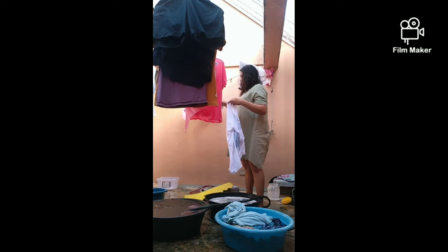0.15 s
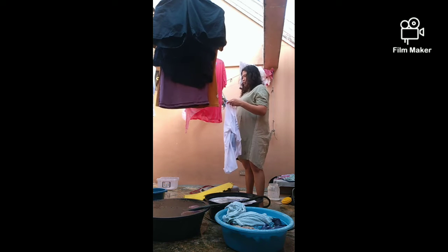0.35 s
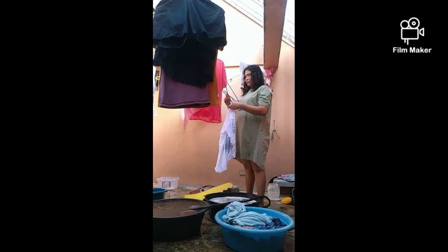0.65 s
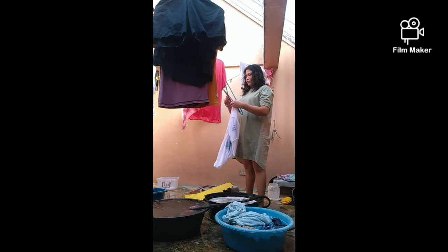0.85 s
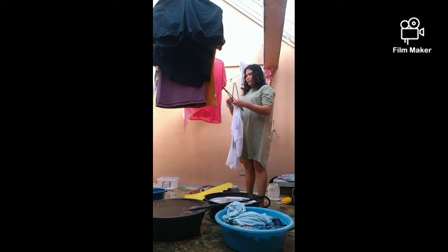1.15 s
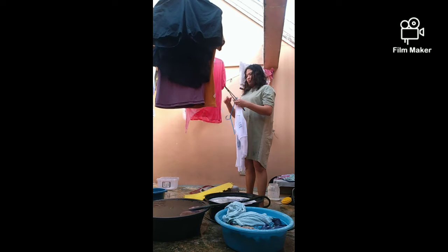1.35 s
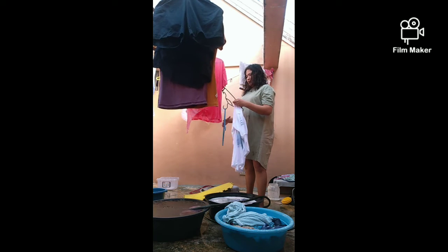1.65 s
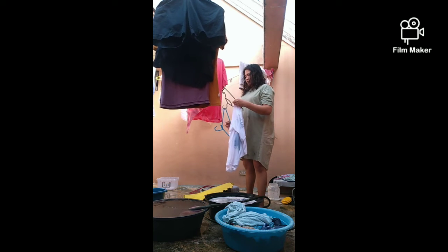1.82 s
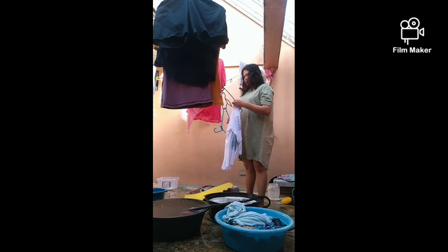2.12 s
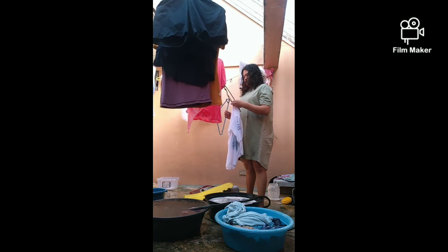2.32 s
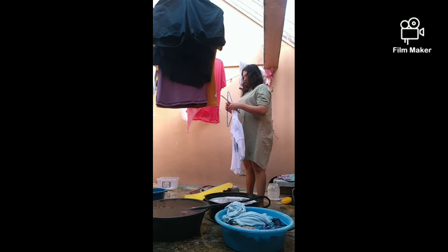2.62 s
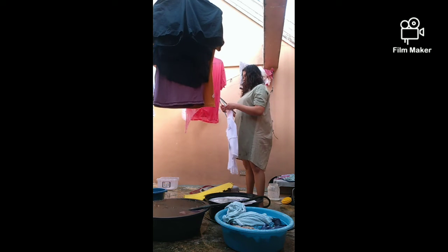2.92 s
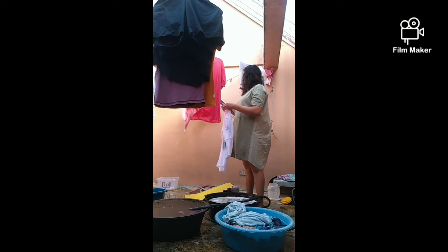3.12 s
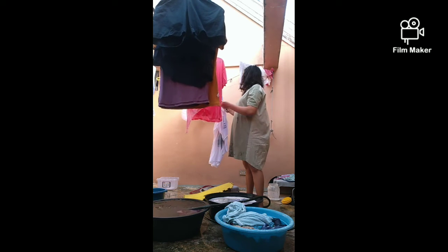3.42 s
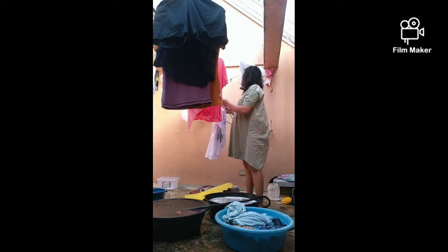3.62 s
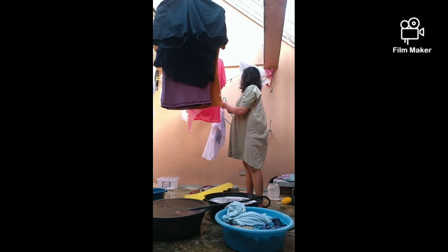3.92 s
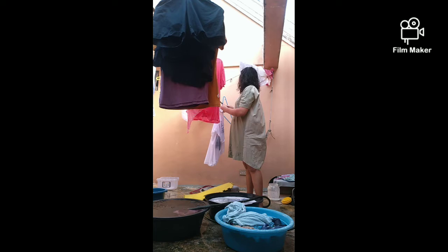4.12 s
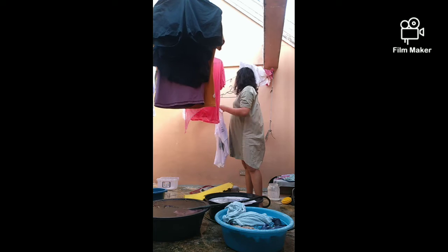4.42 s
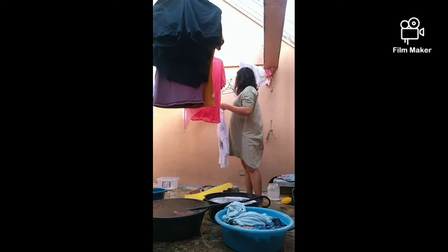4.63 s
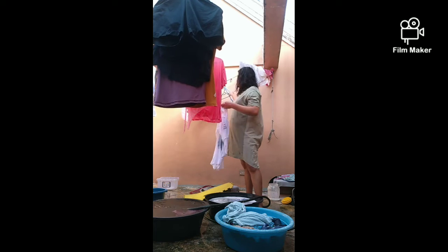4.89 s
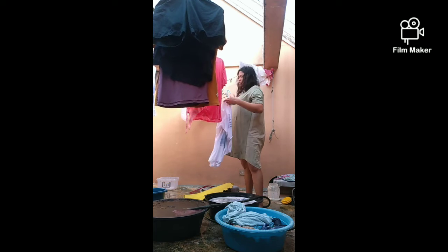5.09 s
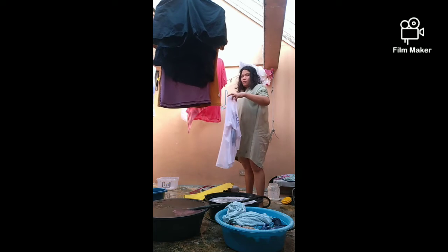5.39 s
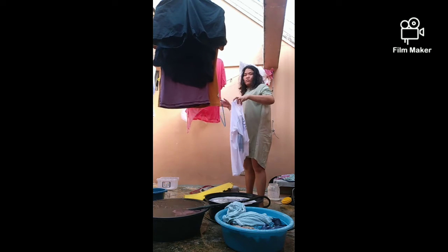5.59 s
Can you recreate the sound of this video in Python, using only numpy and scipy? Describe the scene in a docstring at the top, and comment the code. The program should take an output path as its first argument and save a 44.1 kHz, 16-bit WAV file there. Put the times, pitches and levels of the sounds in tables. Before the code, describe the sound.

Hangers clatter and click as wet laundry is hung in a small walled yard, with drips plinking into basins and faint far birds.

```python
"""Hangers clatter as wet laundry is hung up in a small walled yard; more hangers click and wet cloth drags.
Clatter and clicks are filtered noise bursts; the cloth is crackle through a sliding resonance, with squelches.
Drips into basins are ringing bubbles; basins knock as damped modes; air thumps on the right microphone port.
Far off a small bird chirps in noise glides, and what may be a dove and a rooster call in wavering tones.
A faint background lies beneath, and a thin filtered hiss comes and goes on the right."""
import sys
import numpy as np
from scipy import signal
from scipy.fft import rfft, irfft, next_fast_len
from scipy.io import wavfile
from scipy.ndimage import map_coordinates

SR = 44100
rng = np.random.default_rng(int(sys.argv[2]) if len(sys.argv) > 2 else 0)


def put_to_file(sound):
    """Save the sound as 16-bit audio at rate SR, in the file named by the first command-line argument."""
    columns = np.atleast_2d(sound).T  # one column per channel
    safe = np.clip(columns, -1, 1)
    whole_steps = np.round(safe * 32767)
    wavfile.write(sys.argv[1], SR, whole_steps.astype(np.int16))


N = 253575

# Filter of a hollow knock or a slap on water. Each row: frequency in Hz, relative gain in dB.
KNOCK_COLOUR = [(300, -13.5), (700, -15), (1200, -11), (2000, 6.5), (3000, 11), (4500, 5.5), (7000, -59.5)]
# Filter of rubbed wet cloth or of spray. Each row: frequency in Hz, relative gain in dB.
HISS_COLOUR = [(1760, -38.5), (3000, -31), (5000, -11), (6800, -6.5), (7920, -2), (9200, -7), (14100, -29)]


def amp(db):
    """Decibels express an amplitude ratio on a logarithmic scale."""
    return 10 ** (np.asarray(db) / 20)


def unit(x):
    """Normalization: x is scaled to a root-mean-square value of one."""
    return x / np.sqrt(np.mean(x ** 2) + 1e-20)


def along(points, hz):
    """Interpolation of (Hz, value) points on a logarithmic frequency axis."""
    f, v = np.transpose(points)
    return np.interp(np.log(hz + 1), np.log(f + 1), v)


def curves(rows):
    """Linear interpolation in time: one value per sample for each column after the time."""
    s, *columns = np.transpose(rows)
    return [np.interp(np.arange(N) / SR, s, column) for column in columns]


def wobble(rate, size):
    """Band-limited fluctuation: a smooth curve through random knots, rate of them a second."""
    knots = rng.standard_normal(int(size * rate / SR) + 4)
    return map_coordinates(knots, [np.arange(size) * rate / SR])


def coloured(x, spectrum):
    """Minimum-phase filtering: a folded cepstrum gives the (Hz, dB) shape without pre-echo."""
    size = x.shape[-1]
    m = 2 * next_fast_len(size // 2 + 2048)
    gain = amp(along(spectrum, np.fft.rfftfreq(m, 1 / SR)))
    cepstrum = irfft(np.log(gain + 1e-6))
    cepstrum[1:m // 2] *= 2
    cepstrum[m // 2 + 1:] = 0
    response = np.exp(rfft(cepstrum))
    return irfft(rfft(x, m) * response, m)[..., :size]


def panned(lean_db):
    """Constant-power panning: lean_db is the left level minus the right."""
    g = amp(np.array([lean_db, -lean_db]).reshape(2, -1) / 2)
    return g / np.sqrt(np.mean(g ** 2, axis=0))


def add(track, s, sound):
    """Superposition: a sound is mixed into the track at s seconds."""
    start = max(round(s * SR), 0)
    track[:, start:start + sound.shape[-1]] += sound[..., :max(N - start, 0)]


def yard(x, wet_db, stretch=1):
    """Reverberation: a noise tail, decaying by frequency, stands for the walls and differs at each port."""
    # Decay of the walls. Each row: frequency in Hz, time in seconds to fall 60 dB when stretch is 1.
    decay = [(300, 0.67), (1300, 0.42), (3500, 0.38), (8000, 0.27), (13000, 0.42)]
    hz, t, z = signal.stft(rng.standard_normal((2, SR // 2)), SR, nperseg=256)
    t60 = stretch * along(decay, hz)[:, None]
    tail = signal.istft(z * amp(-60 * t / t60), SR, nperseg=256)[1]
    response = amp(wet_db) * tail / np.linalg.norm(tail[0])
    response[:, 0] += 1  # direct sound
    return signal.fftconvolve(np.atleast_2d(x), response / np.hypot(1, amp(wet_db)), axes=1)


def patchy(x, depth_db, width_hz, span):
    """Short-lived resonances: random patches of gain, width_hz wide and span seconds long."""
    hz, t, z = signal.stft(x, SR, nperseg=256)
    grid = np.meshgrid(hz / width_hz, t / span, indexing="ij")
    knots = rng.standard_normal((int(hz[-1] / width_hz) + 3, int(t[-1] / span) + 3))
    gain = amp(depth_db * map_coordinates(knots, grid))
    return signal.istft(z * gain, SR, nperseg=256)[1][..., :x.shape[-1]]


def crackle(rate, spread_db, smooth):
    """Shot noise: random snaps, rate a second, reverberate over a share of smooth noise."""
    signs = (rng.random(N) < rate / SR) * rng.choice([-1, 1], N)
    snaps = signs * amp(spread_db * np.minimum(rng.exponential(size=N), 4))
    return unit(yard(snaps, wet_db=13, stretch=0.55)[:, :N]) + smooth * rng.standard_normal((2, N))


def noisy_glide(length, hz_from, hz_to, width):
    """Narrow-band noise: two random envelopes modulate a gliding carrier; width is a share of hz_from."""
    u = np.linspace(0, 1, int(length * SR))
    phase = 2 * np.pi * np.cumsum(hz_from * (hz_to / hz_from) ** u) / SR
    band = wobble(width * hz_from, len(u)) * np.sin(phase) + wobble(width * hz_from, len(u)) * np.cos(phase)
    sputter = amp(3.5 * wobble(130, len(u)))
    return unit(band * sputter * signal.windows.tukey(len(u), .3))


def clatter():
    """Modal ringing after impact noise: hangers rattle together, ring briefly and settle."""
    # Filters of the treble and the body. Each row: frequency in Hz, relative gain in dB.
    top_colour, body_colour = [(2060, -38.5), (3500, -35), (4090, -29), (5660, -21), (6320, -25),
                               (7790, -14.5), (9770, -23), (10400, -31.5), (12000, -28), (12900, -41.5),
                               (14000, -37)], [(210, -18.5), (350, -42), (600, -12.5), (921, -20.5),
                                                    (1050, -15), (1310, -17), (1430, -10.5), (2710, -10.5),
                                                    (2930, -13), (3800, -24), (4940, -49.5), (8360, -120)]
    # Modes of the hangers. Each row: frequency in Hz, relative level in dB, time to fall 60 dB in seconds.
    modes = [(1055, -3, 0.16), (1290, -9.5, 0.34), (1387, -2, 0.35), (1510, -12.5, 0.099), (1970, -5, 0.43),
             (3020, 1, 0.1), (6550, 3, .22), (7300, 4.5, 0.27), (7560, -2.5, .25), (8360, -4, 0.32),
             (8060, -2, .3), (9100, 0.5, 0.16), (9600, -2, 0.33)]
    top_db, top_db_per_s = -24, 192
    body_db, body_db_per_s = -31, 164  # the body settles more slowly
    ring_db = -23  # peak, before panning
    t = np.arange(N) / SR
    top = unit(patchy(coloured(crackle(1500, 3.4, 0.86), top_colour), 5.9, 250, 0.098))
    top = top * amp(top_db - top_db_per_s * t)
    body = unit(patchy(coloured(crackle(900, 3.2, .3), body_colour), 4.5, 250, .022))
    body = body * amp(body_db - body_db_per_s * t)
    ring, t = 0, t[:SR]
    for hz, db, t60 in modes:
        phase = 2 * np.pi * (hz * t + rng.random((2, 1))) + 0.36 * wobble(87, SR)
        ring = ring + amp(db - 60 * t / t60) * np.sin(phase)
    out = top * panned(-6.0) + body * panned(-3.1)
    add(out, 0, amp(ring_db) * ring / np.abs(ring).max() * panned(-14))
    return out


def air(shared=4.6):
    """Partly coherent noise: both ports share most of the yard's faint, uneven background."""
    # Filter of the background. Each row: frequency in Hz, relative gain in dB.
    air_colour = [(25, -35), (55, 5), (90, 3.5), (230, -1.5), (380, -14), (1100, -25.5), (2500, -28.5),
                  (6500, -31.5), (7900, -22.5), (9400, -30), (14000, -44)]
    # The background sinks at the end. Each row: time in seconds, change of level in dB.
    fade = [(5.35, 0), (5.6, -3)]
    noise = rng.standard_normal((2, N)) + shared * rng.standard_normal(N)
    noise = patchy(noise, 3.5, 700, .15)
    level_db = -73 + curves(fade)[0] + 0.39 * wobble(8.7, N)
    return amp(level_db) * unit(coloured(noise, air_colour))


def far_hiss(lean_db=-17):
    """Filtered noise with a slow envelope: a thin, uneven far hiss reaches mainly the right port."""
    # Envelope. Each row: time in seconds, mean level in dB.
    envelope = [(0, -72.5), (0.6, -73), (1.9, -82), (3.75, -87), (4.75, -82.5), (5.75, -86)]
    # Filter of the hiss. Each row: frequency in Hz, relative gain in dB.
    far_colour = [(3000, -37), (6300, -17.5), (7800, -0.5), (8600, -7.5), (10000, -30), (14000, -44)]
    level_db, = curves(envelope)
    noise = patchy(coloured(rng.standard_normal((2, N)), far_colour), 3.5, 600, .06)
    return amp(level_db + 1.0 * wobble(35, N)) * unit(noise) * panned(lean_db)


def drips(attack=0.0037, splat_db=-18):
    """Bubble resonance: a drop slaps the water, throws spray and traps a ringing bubble and smaller ones."""
    # Each row: start in seconds, peak level before panning in dB, bubble pitch in Hz,
    # left minus right in dB, spray level relative to the bubble in dB.
    drops = [(0.026, -31.5, 1036, -8, -14), (0.073, -35, 1446, -6, -28), (0.098, -41, 2310, -6.5, -23.5),
             (0.212, -49.5, 2126, -15, -16), (0.231, -53, 2226, -8.5, -18), (0.3054, -56, 2850, -20, -27),
             (0.829, -38, 2090, -15, -25), (1.051, -43, 2737, -14, -13.5), (1.143, -42.5, 1950, -8, -19.5),
             (1.6713, -48, 2860, -25, -7), (1.7722, -42.5, 1458, -9.5, -32.5),
             (1.996, -47, 2020, -12.5, -16), (2.08, -44, 2596, -13, -27.5), (2.152, -51, 3050, -9.5, -21),
             (2.174, -44, 2475, -12.5, -23.5), (2.4537, -59, 3100, -32, -24),
             (2.468, -50.5, 1570, -36.5, -20), (2.506, -61, 2650, -22, -21), (2.575, -62, 3600, -21, -24),
             (2.612, -58, 3160, -5, -24), (2.6333, -48, 2560, -26, -19), (3.1063, -42.5, 1995, -7, -28),
             (3.269, -53.5, 2740, -12.5, -17), (3.438, -54, 2130, -8.5, -21), (3.4964, -57, 2160, -10, -26),
             (3.5126, -40.5, 2387, -14, -27), (3.536, -47.5, 2440, -10, -24), (3.6226, -52, 2920, -24, -32),
             (3.6504, -49.5, 2903, -33, -36), (3.8418, -58.5, 2270, -22.5, -28),
             (4.0469, -44.5, 1602, -24, -22.5), (4.071, -51.5, 1650, -5, -36),
             (4.2453, -47.5, 2360, -22.5, -23), (4.8376, -57, 2360, -20, -27),
             (5.0694, -56, 2276, -11, -22), (5.488, -61, 2330, -20.5, -22)]
    satellite_db, satellite_spread, satellite_s = -15, .2, .025  # level, pitch scatter (share), latest start
    echo_db, echo_s = -11, .021  # the nearest wall returns each drip
    out, t = np.zeros((2, N)), np.arange(SR // 12) / SR

    def bubble(hz, delay, t60):
        """Damped oscillation: an unsteady pitch dies by 60 dB in t60 seconds."""
        age = np.maximum(t - delay, 0)
        pitch = hz * np.exp(.036 * wobble(900, len(t)))
        onset = 1 - np.exp(-(age / attack) ** 2)
        return np.sin(2 * np.pi * np.cumsum(pitch) / SR) * amp(-60 * age / t60) * onset

    for s, db, hz, lean_db, spray_db in drops:
        bubbles = bubble(hz, 0, .038) * amp(2.3 * wobble(400, len(t)))
        for _ in range(3):
            small_hz = hz * np.exp(rng.normal(0, satellite_spread))
            bubbles += amp(satellite_db) * bubble(small_hz, satellite_s * rng.random() ** 2, .025)
        slap = amp(splat_db) * coloured(rng.standard_normal(len(t)) * amp(-60 * t / 0.023), KNOCK_COLOUR)
        spray = unit(coloured(rng.standard_normal(len(t)), HISS_COLOUR)) * amp(spray_db - 60 * t / 0.1)
        echo = amp(echo_db) * bubble(hz, echo_s, .035)
        splash = (slap + spray) * (1 - np.exp(-t / attack))
        plink = yard(bubbles + echo + splash, wet_db=-5, stretch=0.7)
        add(out, s, amp(db) * plink / np.abs(plink).max() * panned(lean_db))
    return out


def squeaky(x, centre_hz):
    """Time-varying resonance: x passes a spectral peak whose pitch slides."""
    peak_db, width_octaves = 8, .16
    hz, t, z = signal.stft(x, SR, nperseg=256)
    centre = np.interp(t * SR, np.arange(len(centre_hz)), centre_hz)
    octaves = np.log2((hz[:, None] + 1) / centre)
    gain = amp(peak_db * np.exp(-.5 * (octaves / width_octaves) ** 2))
    return unit(signal.istft(z * gain, SR, nperseg=256)[1][:, :x.shape[-1]])


def cloth():
    """Stick-slip friction: wet cloth jerks over the hanger; hiss and rasp swell, hold and die as a squeak slides."""
    # Each row: start in seconds, swell in seconds, hold in seconds, hiss level in dB, rasp level in dB,
    # squeak in Hz at the start, squeak in Hz at the end of the hold.
    strokes = [(0.171, 0.015, 0.023, -54.5, -58.5, 7060, 6530), (0.847, 0.011, 0.16, -65, -81, 7700, 7300),
               (1.63, 0.015, 0.11, -49, -67.5, 5760, 8240), (2.389, 0.0027, 0.011, -52, -77, 8600, 9100),
               (2.445, 0.021, 0.055, -61, -79, 8500, 7640), (2.553, 0.022, 0.042, -45, -66, 6330, 8200),
               (2.656, 0.022, 0.016, -51.5, -50.5, 6000, 6900),
               (3.327, 0.038, 0.043, -48.5, -95, 9200, 6500), (3.404, 0.011, 0.078, -42, -73.5, 8350, 6550),
               (3.48, 0.0096, 0.14, -68.5, -65, 6000, 7700), (4.136, 0.052, 0.082, -43.5, -62, 5560, 8500),
               (4.286, 0.0037, 0.02, -45, -53.5, 7360, 7000), (4.358, 0.0032, 0.0083, -45, -60, 7900, 7550),
               (4.403, 0.0032, 0.0092, -46.5, -60, 8040, 5900), (4.502, 0.022, 0.012, -57, -77, 7800, 8420),
               (4.882, .003, .008, -67, -78, 8100, 7900), (4.919, 0.042, 0.052, -51, -59.5, 7040, 8200),
               (5.024, 0.0053, 0.038, -48.5, -64, 8240, 7660), (5.077, 0.025, 0.12, -52, -62, 7700, 6950),
               (5.195, 0.05, 0.066, -45, -57, 7000, 5700), (5.325, 0.042, 0.015, -42.5, -67, 7400, 7460),
               (5.41, 0.0079, 0.013, -61, -82, 7450, 7300), (5.508, 0.02, 0.011, -59.5, -84, 9800, 6200)]
    # Filter of the rasp. Each row: frequency in Hz, relative gain in dB.
    rasp_colour = [(500, -15.5), (1100, -32), (1800, -19), (2600, -3), (3800, -2.5), (6000, -17.5)]
    slips_per_s, slip_s, slip_size = 45, .006, .55  # small jerks: rate, life, size against the steady pull
    swell_db, release_db_per_s, grab_s = 15.5, 267, 0.01  # growth, dying away, time to take hold
    rasp_growth = 2.5  # the rasp follows the pull more steeply than the hiss
    jerks = (rng.random(N) < slips_per_s / SR) * rng.uniform(.3, 1, N)
    grip = 1 + slip_size * signal.lfilter([1], [1, -np.exp(-1 / (slip_s * SR))], jerks)
    hiss = unit(grip * patchy(coloured(crackle(900, 3.8, .3), HISS_COLOUR), 2.5, 550, .02))
    rasp = unit(grip * patchy(coloured(crackle(500, 3.3, .3), rasp_colour), 4, 300, .025))
    out = np.zeros((2, N))
    for s, swell_s, hold_s, hiss_db, rasp_db, hz_from, hz_to in strokes:
        span = np.arange(round(s * SR), min(round(s * SR) + SR // 2, N))
        t = (span - span[0]) / SR
        squeak_hz = hz_from * (hz_to / hz_from) ** np.clip(t / (swell_s + hold_s), 0, 1)
        pull_db = -swell_db * np.clip(1 - t / swell_s, 0, 1)
        release = amp(-release_db_per_s * np.maximum(t - swell_s - hold_s, 0))
        contact = np.clip(t / grab_s, 0, 1) * release
        add(out, s, contact * amp(hiss_db + pull_db) * squeaky(hiss[:, span], squeak_hz) * panned(-6.5))
        add(out, s, contact * amp(rasp_db + rasp_growth * pull_db) * rasp[:, span] * panned(-6.5))
    return out


def note(length, hz_from, hz_to, waver, partials, flutter_db):
    """Harmonic synthesis: a wavering bird note with soft ends, each partial fluttering in level."""
    u = np.linspace(0, 1, int(length * SR))
    pitch = hz_from * (hz_to / hz_from) ** u * (1 + waver * wobble(170, len(u)))
    phase = 2 * np.pi * np.cumsum(pitch) / SR
    tone = sum(amp(db + flutter_db * wobble(50, len(u))) * np.sin(round(k) * phase) for k, db in partials)
    return unit(tone * signal.windows.tukey(len(u), .5))


def birds():
    """Reverberant blurring: distant chirps, wavering tones and crowing mix with their reflections."""
    # Falling chirps of a small bird. Each row: start in seconds, length in seconds, level in dB.
    chirp_rows = [(0.524, 0.094, -64), (2.47, 0.1, -69.5), (3.546, 0.087, -65), (4.586, 0.073, -67.5),
                  (4.719, 0.073, -78.5), (5.647, 0.068, -68.5)]
    # Coos, and from 4.3 s on fainter wavering tones near 520-560 Hz that are probably part of the far crow.
    # Each row: start in seconds, length in seconds, central pitch in Hz, level in dB,
    # waver as a share of the pitch.
    tone_rows = [(0.305, 0.049, 573, -74, 0.044), (2.445, 0.015, 386, -67, 0.042),
                 (3.33, 0.12, 488.6, -57, 0.02), (3.45, 0.059, 479.5, -70.5, 0.048),
                 (4.361, 0.13, 519.5, -66, 0.064), (4.655, 0.092, 557, -74.5, 0.068),
                 (4.773, 0.11, 541, -68, 0.12)]
    # Syllables of a far crow. Each row: start in seconds, length in seconds, level in dB.
    crow_rows = [(4.388, 0.13, -64.5), (4.725, 0.1, -65), (4.92, 0.21, -74.5)]
    # Partials of the crow. Each row: harmonic number, relative level in dB.
    throat = [(2, 2.5), (3, -7.5), (4, -6.5)]
    chirp_hz, octaves_per_s = 5020, 6.2  # every chirp starts here and falls at this rate
    crow_hz = 454.4  # fundamental, itself silent
    out = np.zeros((2, N))
    for s, length, db in chirp_rows:
        end_hz = chirp_hz / 2 ** (octaves_per_s * length)
        chirp = yard(noisy_glide(length, chirp_hz, end_hz, .16), wet_db=5, stretch=1.1)
        add(out, s, amp(db) * patchy(chirp, 3.5, 350, .025) * panned(-9.0))
    for s, length, hz, db, waver in tone_rows:
        tone = yard(note(length, hz, hz, waver, [(1, 0)], 2.5), wet_db=-5, stretch=0.55)
        add(out, s, amp(db) * tone)
    for s, length, db in crow_rows:
        syllable = yard(note(length, crow_hz, crow_hz, .036, throat, 4), wet_db=6, stretch=1.2)
        add(out, s, amp(db) * syllable)
    return out


def puffs(ragged=0.46):
    """Pressure swings and turbulence: each puff drives the right port unevenly and leaves a wake of eddies."""
    # Each row: centre in seconds, level in dB, standard deviation of the bell-shaped envelope in seconds.
    puff_rows = [(0.51, -25, 0.004), (0.525, -36.5, 0.0049), (0.614, -34, 0.01), (0.651, -35, 0.01),
                 (0.782, -38.5, 0.0056), (0.887, -39, 0.018), (0.944, -33.5, 0.0061), (1.034, -50, 0.03),
                 (1.616, -46.5, 0.006), (1.889, -45, 0.012), (2.343, -44, 0.02), (2.456, -46.5, 0.0091),
                 (3.461, -48, 0.028), (3.596, -31.5, 0.028), (3.643, -27, 0.013), (3.79, -38, 0.0087),
                 (3.877, -23.5, 0.0035), (3.903, -31, 0.018), (3.988, -33, 0.0038), (4.793, -45, 0.012),
                 (4.836, -50, 0.065)]
    # Filter of the eddies. Each row: frequency in Hz, relative gain in dB.
    eddy_colour = [(25, -29.5), (55, 12), (150, 5), (240, -7.5), (330, -30), (900, -43.5), (3000, -100)]
    port_hz = 90.98  # central rate of the swing
    wake_db, wake_db_per_s = -15.5, 92
    out, t = np.zeros((2, N)), np.arange(-SR // 8, SR // 3) / SR
    wake = np.clip(t * port_hz, 0, 1) * amp(wake_db - wake_db_per_s * np.abs(t))
    for s, db, length in puff_rows:
        swing = np.sin(2 * np.pi * np.cumsum(port_hz * np.exp(0.207 * wobble(121.0, len(t)))) / SR)
        eddies = unit(coloured(rng.standard_normal((2, len(t))), eddy_colour))
        gust = ragged * np.exp(-np.abs(t) / (1.38 * length))
        push = swing * np.exp(-.5 * (t / length) ** 2) + eddies * np.maximum(gust, wake)
        add(out, s + t[0], amp(db) * push * panned(-40))
    return signal.sosfilt(signal.butter(4, 50, "high", fs=SR, output="sos"), out)  # the port passes no deep bass


def gurgle(count=1500, typical_hz=2050, spread=0.403, life_cycles=8):
    """Granular bubble noise: tiny bubbles of scattered pitch and size each last a few cycles."""
    when, pitch, size = rng.random(count), rng.standard_normal(count), rng.random(count)
    t = np.arange(SR // 40) / SR
    cycles = typical_hz * np.exp(spread * 1.61 * np.tanh(pitch / 1.6))[:, None] * t
    age = cycles / life_cycles
    grains = size[:, None] ** 2 * age * np.exp(-2 * age) * np.sin(2 * np.pi * cycles)
    index = (when * N).astype(int)[:, None] + np.arange(len(t))
    stream = np.bincount(index.ravel(), grains.ravel(), N)[:N]
    return unit(yard(stream, wet_db=18.0, stretch=0.24)[:, :N])


def squelches(wet_db=1, lean_db=-9):
    """Cavity resonance: pitch slides as a wet fold's air pocket opens or closes, and tiny bubbles escape."""
    # Water pressed through the weave. Each row: start in seconds, length in seconds, start pitch in Hz,
    # end pitch in Hz, level in dB.
    folds = [(1.645, 0.014, 6000, 5480, -55.5), (1.697, 0.055, 5870, 4770, -56.5),
             (2.388, 0.17, 758, 830, -71.5), (2.442, 0.25, 1560, 1710, -86),
             (2.469, 0.041, 4690, 4370, -63.5), (2.555, 0.018, 5800, 5650, -49.5),
             (3.359, 0.083, 3760, 5150, -66.5), (3.47, .03, 6000, 5380, -52), (3.563, 0.1, 4630, 3700, -70),
             (3.598, 0.075, 3100, 2610, -66), (4.155, 0.096, 5610, 3275, -56.5),
             (4.194, 0.19, 2905, 1684, -64), (4.405, 0.021, 5780, 4900, -48.5),
             (4.495, 0.02, 2790, 2280, -61), (4.886, 0.0205, 4170, 3900, -62.5),
             (4.97, 0.12, 3980, 3350, -63), (5.037, 0.054, 2700, 1896, -71),
             (5.154, 0.11, 1737, 2124, -62.5), (5.191, 0.055, 6810, 5990, -53.5),
             (5.203, 0.13, 2550, 4440, -58), (5.366, 0.02, 3156, 3160, -57.5),
             (5.529, 0.022, 4670, 4240, -59)]
    # Bubbles squeezed from the cloth. Each row: start in seconds, length in seconds, level in dB.
    gurgles = [(0.627, 0.072, -70.5), (1.023, 0.069, -70), (1.206, 0.046, -71), (1.491, 0.14, -57),
               (2.42, 0.28, -73.5), (2.648, 0.15, -61.5), (2.807, 0.14, -59.5), (4.257, 0.1, -60.5),
               (5.016, 0.17, -68.5), (5.518, 0.053, -67.5)]
    out, bubbles = np.zeros((2, N)), gurgle()
    for s, length, hz_from, hz_to, db in folds:
        fold = yard(noisy_glide(length, hz_from, hz_to, width=.2), wet_db, stretch=0.62)
        add(out, s, amp(db) * fold * panned(lean_db))
    for s, length, db in gurgles:
        size = int(length * SR)
        piece = bubbles[:, round(s * SR):][:, :size] * signal.windows.tukey(size, .5)
        add(out, s, amp(db) * piece * panned(lean_db))
    return out


def clicks(wet_db=4):
    """Impact after sliding friction: a hanger scrapes, slips with a crack and chatters, and the walls answer."""
    # Each row: time of the crack in seconds, level of the snap in dB,
    # brightness in dB (below 0 hollow, above 0 thin and sharp), lead-in scrape in dB.
    click_rows = [(0.724, -52, 36, -18), (0.7882, -49, 2, -15), (1.0174, -54, -1.5, -23),
                  (1.0488, -59, -5.5, 2), (1.2017, -54.5, -4, -24), (1.2307, -54, -5, -17),
                  (1.361, -64, -12.5, -8), (1.428, -51, -3.5, -22), (1.4844, -41.5, 0, -15),
                  (1.5348, -41.5, -4, -15.5), (1.551, -48, -2, -8), (2.289, -45.5, -2, -27),
                  (2.558, -56, 10, -10), (2.6888, -44, -2.5, -21), (2.7448, -48, -6.5, -27),
                  (2.817, -43, -9.5, -27), (2.857, -53, -9, -7), (2.9065, -46, -5, -18),
                  (3.0902, -69.5, -12.5, -10), (3.1933, -48, -5.5, -11), (3.364, -61, 25, -11),
                  (3.8847, -55.5, -12, -16), (4.137, -69, 56, -24), (4.162, -60, 40, -18),
                  (4.3617, -50, -3, -10), (4.663, -80, 63, -3), (4.923, -55.5, -2, -15),
                  (5.0192, -52.5, 14.5, -12), (5.199, -51.5, -4, -10)]
    # Filters of the snap and the bright edge. Each row: frequency in Hz, relative gain in dB.
    snap_colour, edge_colour = [(1470, -48.5), (2500, -9.5), (2910, -6), (3320, -2.5), (4200, -8),
                                (5390, -1), (8040, 10), (11500, -32), (12000, -19), (15600, -74),
                                (22000, -120)], [(7000, -30.5), (9000, 7.5), (10500, 0.5), (12000, -6.5),
                                              (14000, -25)]
    base_body_db, base_edge_db = -12.5, -11  # against the snap, for a firm click of brightness 0
    # the edge grows with brightness, and in blows harder than a firm one
    edge_per_brightness, edge_per_force, firm_db = 0.67, 0.95, -46.5
    scrape_s, snap_t60_s = 0.0054, 0.027
    spike_db, spike_s = -4, 0.00072  # the hard first instant of the crack
    chatter_db, chatter_db_per_s, chatter_s = -12.5, 215, 0.044  # later ticks: level, fading, spread
    out, t = np.zeros((2, N)), np.arange(-SR // 50, SR // 20) / SR

    def level(part):
        """Normalization by the standard deviation over the span of the blow."""
        return part / np.std(part[:, :len(t)])

    def tick(delay):
        """Exponential decay: an abrupt start at the delay, then a steady fall in dB."""
        return (t >= delay) * amp(-60 * np.abs(t - delay) / snap_t60_s)

    scrape = (t < 0) * np.exp(-np.abs(t) / scrape_s)
    spike = (t >= 0) * amp(spike_db) * np.exp(-np.abs(t) / spike_s)
    for s, db, bright_db, scrape_db in click_rows:
        delays = rng.uniform(0, chatter_s, size=4)
        chatter = sum(amp(chatter_db - chatter_db_per_s * delay) * tick(delay) for delay in delays)
        envelope = amp(scrape_db) * scrape + tick(0) + chatter + spike
        crack = yard(rng.standard_normal(len(t)) * envelope, wet_db, stretch=0.68)
        crack = patchy(crack, 2.5, 400, .02)
        snap = level(coloured(crack, snap_colour)) * panned(-7)
        body = level(coloured(crack, KNOCK_COLOUR)) * panned(-9)
        edge = level(coloured(crack, edge_colour))
        body_db = base_body_db - bright_db
        edge_db = base_edge_db + edge_per_brightness * bright_db + edge_per_force * (db - firm_db)
        add(out, s + t[0], amp(db) * (snap + amp(body_db) * body + amp(edge_db) * edge))
    return out


def knocks():
    """Modal damping: a soft blow rings the plastic basin's damped wall."""
    # Each row: start in seconds, level in dB before a common lift of 5.5 dB.
    blows = [(2.69, -71), (2.82, -51.5), (3.883, -45), (4.502, -37.5), (4.523, -50), (5.535, -63)]
    # Modes of the basin. Each row: frequency in Hz, mean relative level in dB, time to fall 60 dB in seconds.
    modes = [(680, -2, 0.021), (858, -9, 0.052), (1043, -7.5, 0.022), (1760, -20.5, 0.096)]
    out, t = np.zeros((2, N)), np.arange(SR // 10) / SR
    for s, db in blows:
        ring = 0
        for hz, mode_db, t60 in modes:
            decay = amp(mode_db + rng.normal(0, 0.64) - 60 * t / t60)
            ring = ring + decay * np.sin(2 * np.pi * hz * t + 1.7 * wobble(215, len(t)))
        soft_ring = ring * (1 - np.exp(-t / 0.0036))
        add(out, s, amp(db + 5.5) * yard(soft_ring, wet_db=-2.5, stretch=0.64))
    return out


def scene():
    """Linear superposition of all sources at the two ports."""
    handling = clatter() + clicks() + cloth() + squelches()
    return handling + drips() + knocks() + puffs() + birds() + air() + far_hiss()


def record(dry):
    """Linear filtering: the two microphone ports differ in colour, and a band limit removes the top."""
    # Colour of the ports. Each row: frequency in Hz, left minus right in dB.
    ports = [(2000, 3.5), (4000, -1), (8000, -5.5), (11500, 4.5)]
    top_hz = 14300
    m = next_fast_len(N + SR // 2)
    hz = np.fft.rfftfreq(m, 1 / SR)
    return irfft(rfft(dry, m) * panned(along(ports, hz)) * (hz < top_hz), m)[:, :N]


dry = scene()
out = record(dry)
put_to_file(out)
```